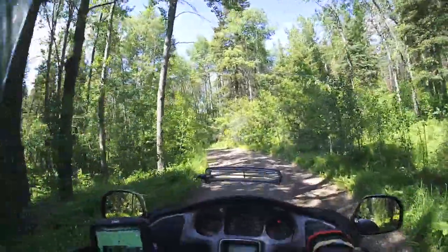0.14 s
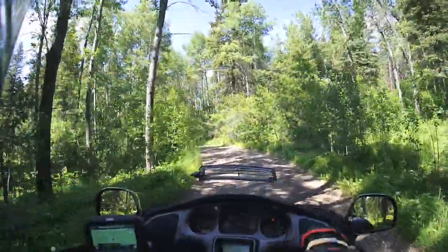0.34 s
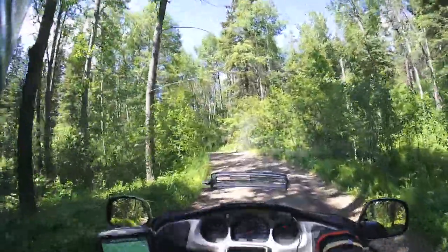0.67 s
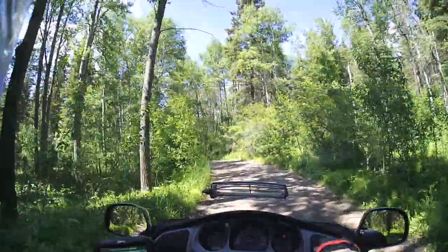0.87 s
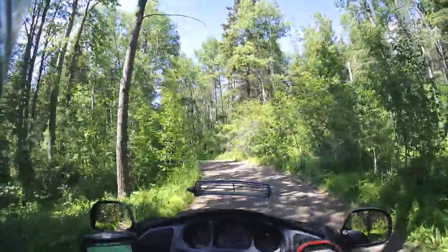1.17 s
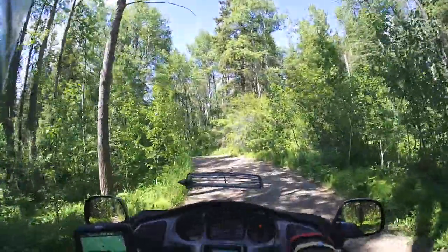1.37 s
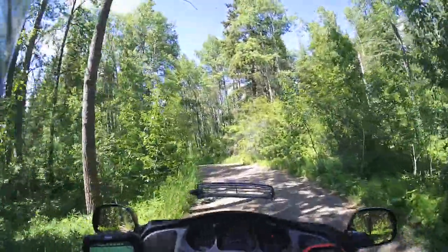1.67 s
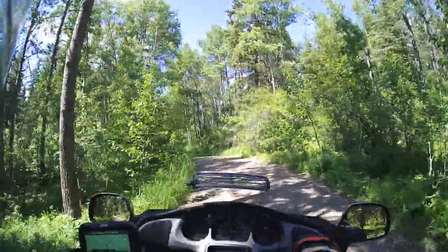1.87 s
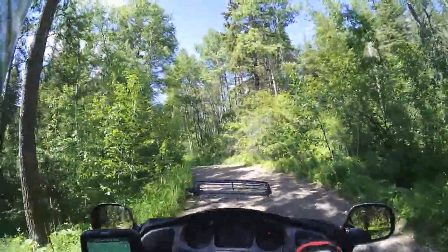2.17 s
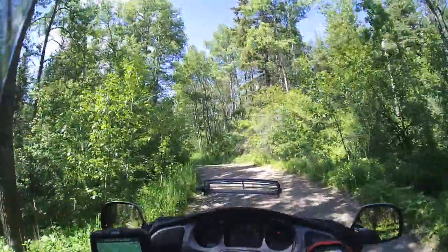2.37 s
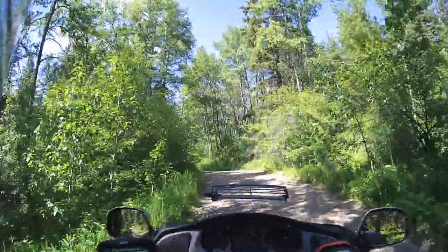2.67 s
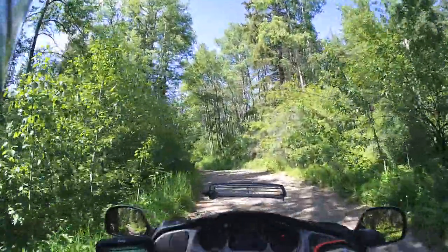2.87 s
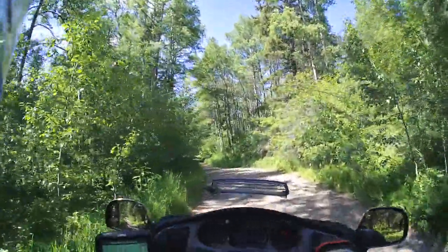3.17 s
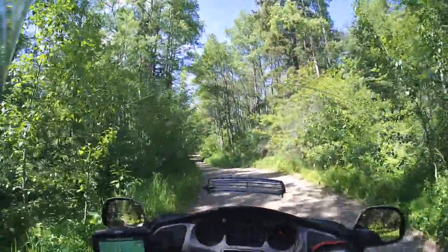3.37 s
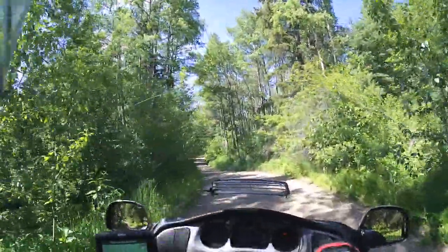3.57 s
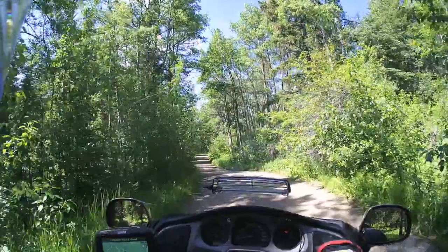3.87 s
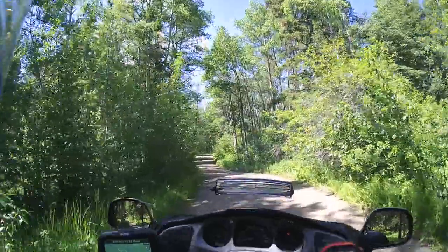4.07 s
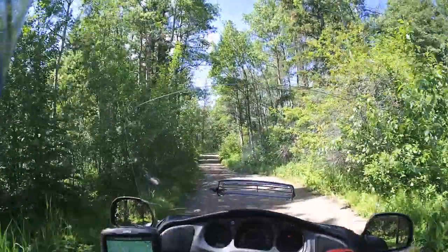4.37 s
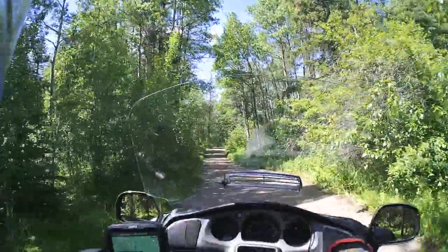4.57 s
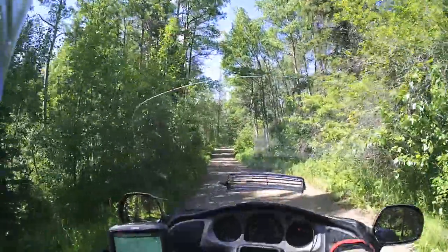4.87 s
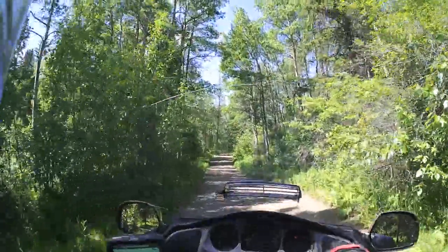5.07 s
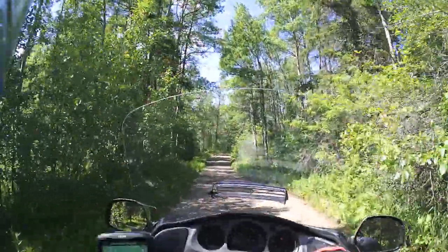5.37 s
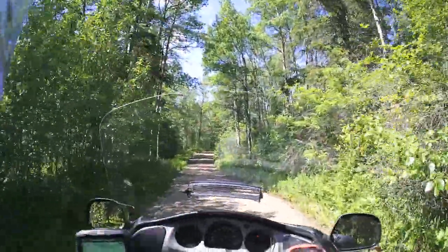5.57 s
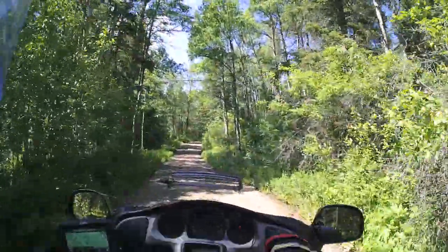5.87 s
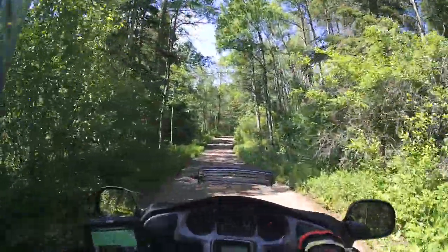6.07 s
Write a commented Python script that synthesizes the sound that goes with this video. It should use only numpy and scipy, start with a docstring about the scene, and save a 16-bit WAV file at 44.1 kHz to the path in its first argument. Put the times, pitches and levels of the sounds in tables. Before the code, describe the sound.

A steady, smooth hiss of wind and road noise runs throughout, heard from behind the windscreen of a slowly moving motorcycle, outdoors with no echo. A very faint engine hum and thin whine lie almost buried beneath it. A brief, soft rasp comes at about 0.1 seconds as a low, rumbling gust hits the microphone. This gust is the loudest part, lasting until about 1.2 seconds, with dull thumps and brief hollow flutters. A small plastic bodywork knock sounds at 0.9 seconds. Short, low puffs and irregular thumps follow, weakening from 2 seconds and ending near 3. The hiss carries on evenly until a softer gust swells at about 4.1 seconds, with a couple of thumps. Light, scattered puffs continue from 4.5 to 5.6 seconds, and a slightly stronger, fluttering puff arrives at about 6 seconds.

```python
"""A touring motorcycle rolls slowly along a forest dirt road, heard from behind its windscreen.
A steady hiss covers a very faint engine hum throughout. A brief rasp opens the scene as air spills
round the screen and buffets the microphone in one long gust, with a small bodywork knock near its end.
Short puffs follow, lone eddies thumping among them; a softer gust swells at about four seconds and
leads into the last puffs. In the strongest air, eddies break off the screen with a hollow flutter."""
import sys
import numpy as np
from scipy import signal
from scipy.fft import rfft, irfft, next_fast_len
from scipy.io import wavfile
from scipy.ndimage import uniform_filter1d, map_coordinates

SR = 44100
rng = np.random.default_rng(int(sys.argv[2]) if len(sys.argv) > 2 else 0)


def materialize(psi):
    """Save the field psi as 16-bit PCM at rate SR to the path in sys.argv[1].

    A 1-D psi becomes a single channel; in a 2-D psi each row is a channel.
    """
    bounded = np.clip(np.atleast_2d(psi).T, -1, 1)
    quanta = np.round(bounded * 32767).astype(np.int16)
    wavfile.write(sys.argv[1], SR, quanta)


N = 274743

# Tone of the rumble in the puffs and the soft gust. Each row: frequency in Hz, relative level in dB.
PUFF_SPECTRUM = [(20, -5), (45, -3), (75, 0), (120, 0), (190, -3.5), (290, -8), (400, -16), (600, -27),
                 (1000, -43), (4000, -95)]


def from_db(db):
    """Decibels to gain."""
    return 10 ** (np.asarray(db) / 20)


def rms_one(x):
    """Scale to unit power."""
    return x / np.sqrt(np.mean(x ** 2) + 1e-20)


def seconds():
    """Time of every sample."""
    return np.arange(N) / SR


def gain_at(spectrum, hz):
    """Read a curve of (Hz, dB) points as gain, on a log-frequency axis."""
    points_hz, points_db = np.transpose(spectrum)
    return from_db(np.interp(np.log(np.maximum(hz, 1)), np.log(points_hz), points_db))


def coloured(colour):
    """Noise of unit power, its spectrum shaped by the gain curve colour(Hz)."""
    size = next_fast_len(N)
    hz = np.fft.rfftfreq(size, 1 / SR)
    return rms_one(irfft(rfft(rng.standard_normal(size)) * colour(hz), size)[:N])


def drift(rate_hz):
    """Slow random wander of unit spread."""
    return coloured(lambda hz: 1 / (1 + (hz / rate_hz) ** 2))


def resonant_noise(centre_hz, width_hz):
    """Noise through a steep-sided resonance."""
    return coloured(lambda hz: 1 / (1 + ((hz - centre_hz) / width_hz) ** 2))


def ring(clicks, hz, t60):
    """Each click sets a sine of its own height ringing, 60 dB down after t60 seconds."""
    decay = from_db(-60 / (t60 * SR))
    step = 2 * np.pi * hz / SR
    return signal.lfilter([0, np.sin(step)], [1, -2 * decay * np.cos(step), decay ** 2], clicks + 1e-18)


def evened(x, span_s=.02):
    """Take the slow swells out of a noise and keep its fast lumps."""
    size = int(span_s * SR)
    return x / np.sqrt(uniform_filter1d(uniform_filter1d(x ** 2, size), size) + 1e-12)


def varispeed(x, speed):
    """Run through a sound at a changing speed: faster is higher."""
    return map_coordinates(x, [np.cumsum(speed)], order=1, mode="mirror")


def swell(top_s, hold_s, rise_db_per_s, fall_db_per_s):
    """Envelope that reaches 1 at top_s, holds, then dies away."""
    age = seconds() - top_s
    down_db = np.maximum(-age * rise_db_per_s, (age - hold_s) * fall_db_per_s)
    return from_db(-np.clip(down_db, 0, 160))


def airflow(swirls, rise_db_per_s, fall_db_per_s):
    """Summed power of several swirls of air, and the speed of those that dominate."""
    powers = np.array([from_db(db) * swell(top_s, hold_s, rise_db_per_s, fall_db_per_s)
                       for top_s, hold_s, db, _ in swirls]) ** 2
    speeds = np.array(swirls)[:, -1]
    power = powers.sum(axis=0)
    return power, speeds @ powers / power


def buffeting(spectrum, power, speed, speed_per_db, lump_db, lump_hz, reference_db=-40):
    """Eddies sweep over the microphone: faster air is louder and, carrying them past sooner, higher."""
    strength_db = 10 * np.log10(power + 1e-12) - reference_db
    flow = speed * np.exp(speed_per_db * np.clip(strength_db, -20, 3))
    eddies = evened(coloured(lambda hz: gain_at(spectrum, hz)))
    lumps = from_db(lump_db * drift(lump_hz))
    return np.sqrt(power) * varispeed(eddies, flow) * lumps


def engine(crank_hz=27.6, wander=.0082):
    """Low orders of the crank hum at a light throttle, with a faint, noisy whine above."""
    # Partials of the hum. Each row: multiple of the crank rate, rms level in dB.
    orders = [(3, -79), (4, -79), (7, -85.5)]
    turns = np.cumsum(crank_hz * (1 + wander * drift(1.65))) / SR
    hum = sum(from_db(db) * np.sqrt(2) * np.sin(2 * np.pi * (order * turns + rng.random()))
              for order, db in orders)
    whine = from_db(-65.5) * resonant_noise(centre_hz=1335, width_hz=48)
    return hum + whine


def hiss(level_db=-45, balance_db=-.02):
    """A smooth bed of broadband hiss, centred except for its very top."""
    # Tone of the hiss. Each row: frequency in Hz, relative level in dB.
    spectrum = [(20, -16), (60, -16.5), (160, -14), (280, -7.5), (420, -6.5), (600, -3), (950, -1.5),
                (1500, 0), (4000, 0), (9300, -0.6), (9650, -3.5), (10050, -13), (10700, -21), (11600, -39)]
    # Its stereo width. Each row: frequency in Hz, side level against mid in dB.
    width = [(9000, -64), (9450, -16), (10000, -4), (10400, -1)]
    size = next_fast_len(N)
    hz = np.fft.rfftfreq(size, 1 / SR)
    mid, side = rfft(rng.standard_normal((2, size))) * gain_at(spectrum, hz)
    ears = np.array([[1], [-1]])
    stereo = irfft(mid + ears * side * gain_at(width, hz), size)[:, :N]
    return from_db(level_db + ears * balance_db / 2) * rms_one(stereo)


def rasp(top_s=.125, glide_per_s=.13, glide_s=.15):
    """A short rub swells fast and fades slowly, creeping up in pitch; a low groan comes with its start."""
    # Resonances of the rub. Each row: centre in Hz, width in Hz, relative level in dB.
    modes = [(1445, 150, 1), (2080, 150, -11)]
    slopes = dict(rise_db_per_s=160, fall_db_per_s=60)
    rub = sum(from_db(db) * resonant_noise(hz, width_hz) for hz, width_hz, db in modes)
    pitch = 1 + glide_per_s * np.minimum(seconds() - top_s, glide_s)
    rub_level = from_db(-51) * swell(top_s, hold_s=.035, **slopes)
    groan = resonant_noise(centre_hz=245, width_hz=55)
    groan_level = from_db(-58) * swell(top_s=.09, hold_s=.06, **slopes)
    return rub_level * varispeed(rub, pitch) + groan_level * groan


def knock(low_cut_hz=620):
    """A plastic body panel is tapped and bounces once; it is too small to give off bass."""
    # The tap and its bounce. Each row: time in seconds, strike level in dB.
    taps = [(0.9104, -34.3), (0.9235, -47)]
    # Modes of the panel. Each row: frequency in Hz, gain in dB, seconds to fade by 60 dB.
    modes = [(860, -19, .035), (1085, -1.5, .042), (1230, -2, .036), (1570, -8, .035)]
    clicks = np.zeros(N)
    for time_s, db in taps:
        clicks[round(time_s * SR)] = from_db(db)
    panel = sum(from_db(db) * ring(clicks, hz, t60) for hz, db, t60 in modes)
    return signal.sosfilt(signal.butter(2, low_cut_hz, "high", fs=SR, output="sos"), panel)


def soft_gust():
    """A gentle stream of air swells and ebbs smoothly over the microphone."""
    level = from_db(-47) * swell(top_s=4.13, hold_s=.12, rise_db_per_s=170, fall_db_per_s=95)
    return buffeting(PUFF_SPECTRUM, level ** 2, speed=.9, speed_per_db=.005, lump_db=1, lump_hz=23)


def flutters(width_hz=42, slope_db_per_s=800):
    """In the strongest air, eddies break off the screen almost regularly: a brief, hollow flutter."""
    # Bursts of flutter. Each row: time of full level in seconds, hold in seconds, level in dB, pitch in Hz.
    bursts = [(.148, .015, -44, 165), (.785, .085, -40, 178), (.995, .05, -42, 150),
              (6.022, .034, -43.5, 145)]
    out = np.zeros(N)
    for top_s, hold_s, db, hz in bursts:
        level = from_db(db) * swell(top_s, hold_s, slope_db_per_s, slope_db_per_s)
        out += level * evened(resonant_noise(hz, width_hz))
    return out


def thumps(half_length_cycles=.55):
    """A lone eddy crosses the microphone: one smooth dip of pressure, shorter for a smaller eddy."""
    # Lone eddies. Each row: time in seconds, peak level in dB, pitch in Hz.
    eddies = [(.312, -31, 82), (.436, -28, 85), (.683, -31, 130), (1.044, -33, 130), (1.993, -38, 105),
              (2.449, -45, 85), (2.545, -41, 110), (2.658, -42, 100), (4.222, -33, 190), (4.255, -36, 100),
              (4.779, -41.5, 95), (4.903, -47, 125), (5.196, -39.5, 85), (5.328, -38.5, 110),
              (5.591, -41, 90), (6.024, -37, 210), (6.225, -42, 75)]
    out = np.zeros(N)
    for time_s, db, hz in eddies:
        cycles = (seconds() - time_s) * hz
        envelope = np.exp(-np.minimum((cycles / half_length_cycles) ** 2, 50))
        out -= from_db(db) * envelope * np.cos(2 * np.pi * cycles)
    return out


def puffs(wake_db=-13, wake_ceiling_db=-63):
    """Swirls of air give short rumbles, deeper when they pass slowly, each wrapped in a soft wake."""
    # Passing swirls. Each row: time of full level in seconds, hold in seconds, level in dB, relative speed.
    swirls = [(1.283, .124, -41, .97), (1.51, .05, -50, 1), (1.605, .135, -50.5, .95),
              (1.758, .08, -44.5, 1), (1.976, .04, -41.8, 1), (2.145, .025, -50.5, .8),
              (2.455, .022, -54, .6), (2.54, .04, -50.5, .85), (2.665, .022, -51.3, .8),
              (2.85, .06, -56, .7), (4.208, .048, -40.5, 1.08), (4.518, .048, -50.5, .8),
              (4.752, .065, -51.5, .75), (4.868, .038, -50.5, .8), (5.19, .07, -54.5, .85),
              (5.272, .065, -51.2, .92), (5.585, .03, -50.5, .9), (6.026, .032, -42.5, 1.02)]
    core, speed = airflow(swirls, rise_db_per_s=560, fall_db_per_s=560)
    wake, _ = airflow(swirls, rise_db_per_s=260, fall_db_per_s=165)
    power = core + np.minimum(wake * from_db(wake_db) ** 2, from_db(wake_ceiling_db) ** 2)
    return buffeting(PUFF_SPECTRUM, power, speed, speed_per_db=.004, lump_db=1.3, lump_hz=23)


def long_gust(stream_speed=.98, lull_db=5, lull_half_width_s=.02):
    """A steady stream of air spills round the screen, with brief lulls in it and broad surges on top."""
    # Tone of the gust's rumble. Each row: frequency in Hz, relative level in dB.
    spectrum = [(20, -11), (55, -1.5), (120, 0), (180, -1), (250, -6.5), (320, -9.5), (400, -15),
                (600, -25), (1000, -42), (4000, -95)]
    # Surges of air. Each row: time of full level in seconds, hold in seconds, level in dB, relative speed.
    surges = [(.435, .07, -37.5, 1.08), (.62, .08, -36.6, 1.04), (.785, .115, -38, 1.05),
              (.995, .055, -40.5, 1.05)]
    stream = from_db(-42.2) * swell(top_s=.138, hold_s=1.032, rise_db_per_s=560, fall_db_per_s=560)
    lulls = sum(np.exp(-((seconds() - time_s) / lull_half_width_s) ** 2)
                for time_s in (.548, .945, 1.105))
    stream_power = (stream * from_db(-lull_db * lulls)) ** 2
    surge_power, surge_speed = airflow(surges, rise_db_per_s=260, fall_db_per_s=380)
    power = stream_power + surge_power
    speed = (stream_power * stream_speed + surge_power * surge_speed) / power
    return buffeting(spectrum, power, speed, speed_per_db=.006, lump_db=1.5, lump_hz=37)


def scene():
    """Everything but the hiss is the same in both ears; the open forest gives no echo."""
    air = hiss() + long_gust() + soft_gust() + puffs() + flutters() + thumps()
    return air + engine() + rasp() + knock()


def record(dry):
    """A steep low-pass cuts the top at 11650 Hz."""
    return signal.sosfilt(signal.ellip(10, .1, 80, 11650, fs=SR, output="sos"), dry)


dry = scene()
out = record(dry)
materialize(out)
```